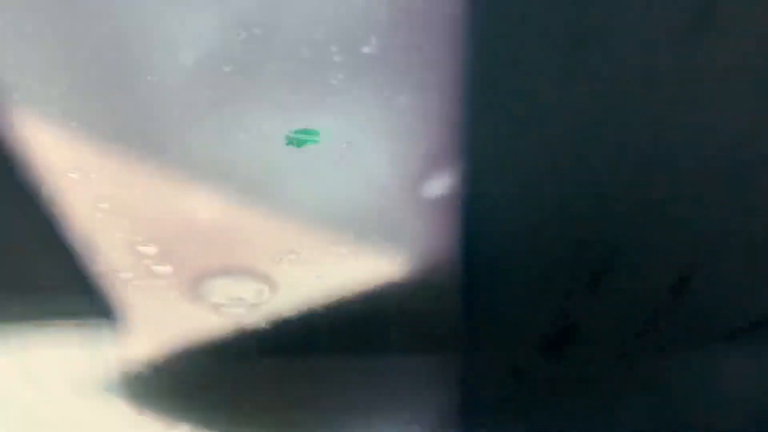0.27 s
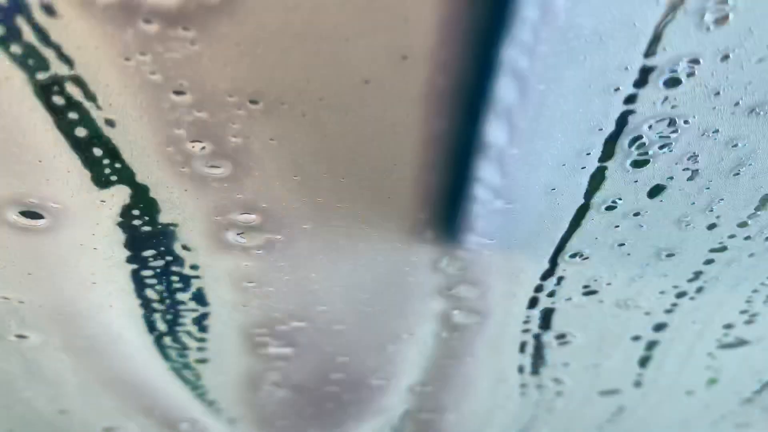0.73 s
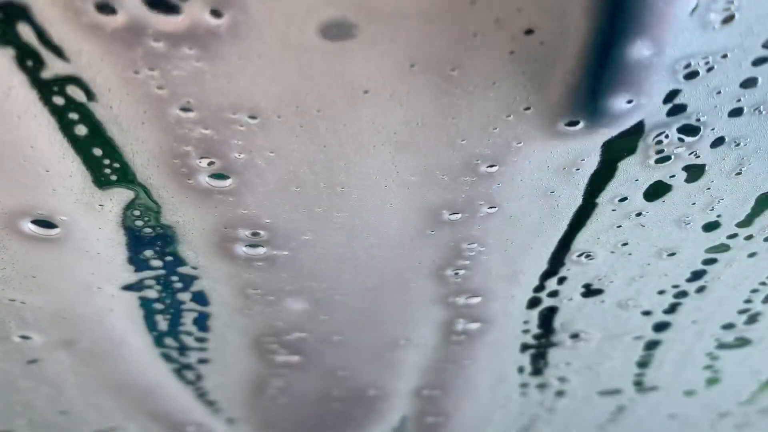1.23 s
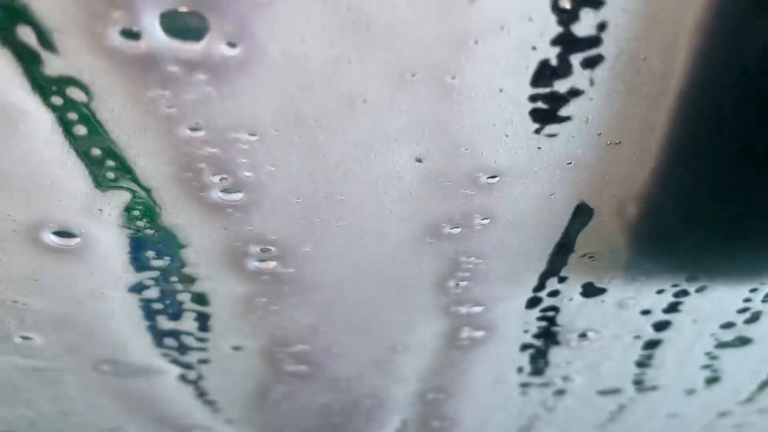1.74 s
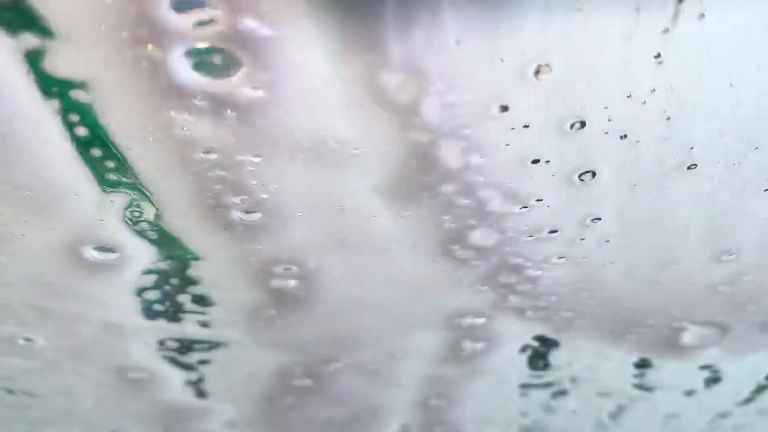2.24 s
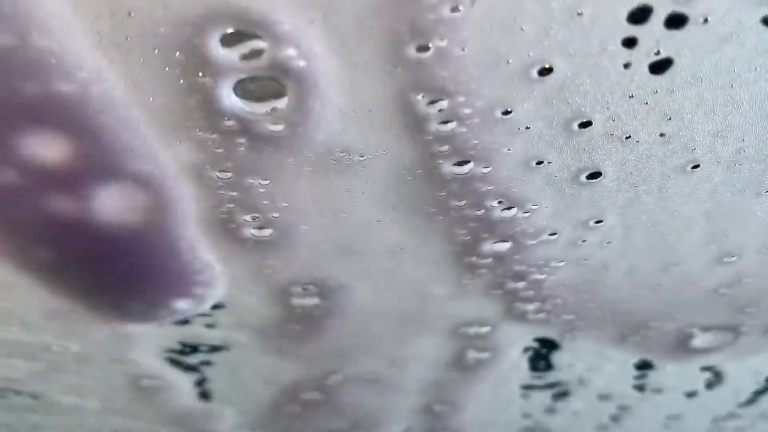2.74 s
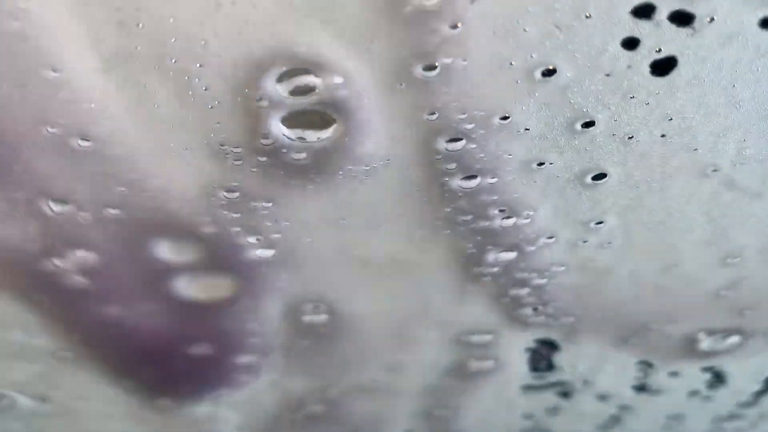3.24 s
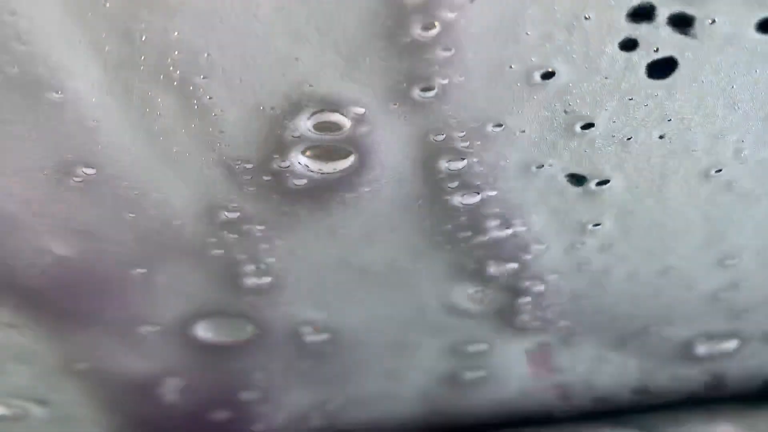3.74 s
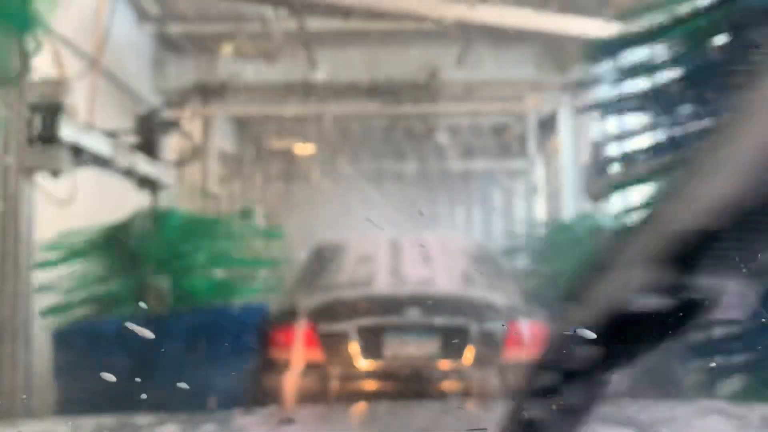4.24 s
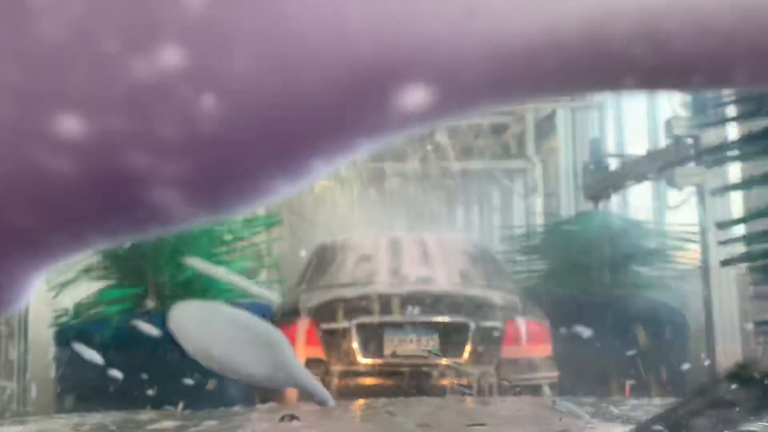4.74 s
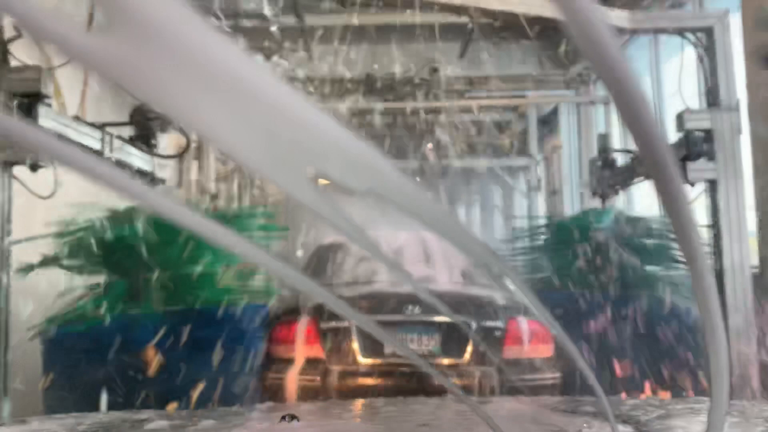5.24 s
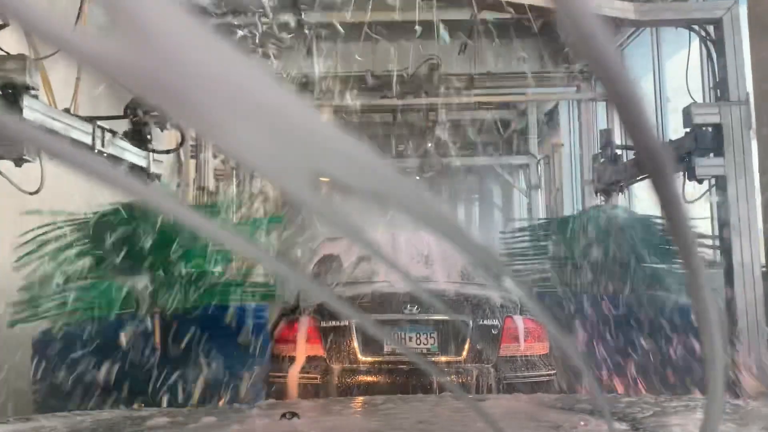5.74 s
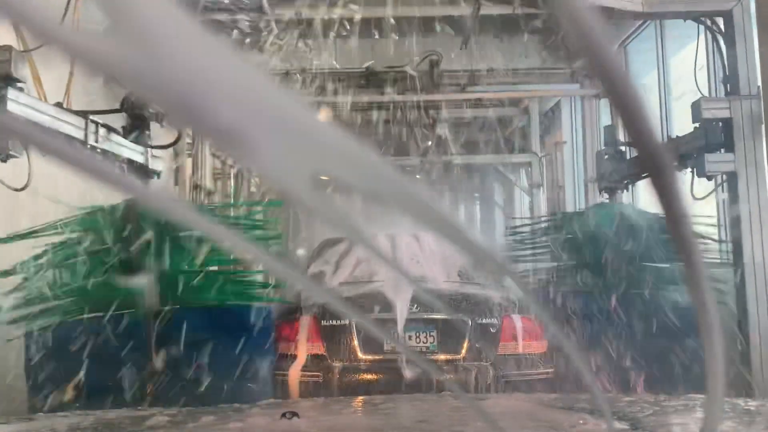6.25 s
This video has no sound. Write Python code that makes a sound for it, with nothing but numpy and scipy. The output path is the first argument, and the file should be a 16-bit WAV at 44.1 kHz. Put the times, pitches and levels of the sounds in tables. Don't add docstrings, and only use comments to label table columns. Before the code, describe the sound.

A low, boomy car interior during a wash, microphone near the glass and doors. Soft wet flapping and deep shaking come first, with a splat on the window. Brush strips then bear down hard, drumming metal, ringing trim and scraping glass, before settling into lighter, uneven slapping along the doors. Water rushes dully over the body, another crisp splat lands, and a tiny high rubber squeak comes near the end.

```python
import sys
import numpy as np
from scipy import signal
from scipy.fft import rfft, irfft, next_fast_len
from scipy.io import wavfile
from scipy.ndimage import uniform_filter1d, map_coordinates

SR = 44100
rng = np.random.default_rng(int(sys.argv[2]) if len(sys.argv) > 2 else 0)


def log_audio(samples):
    frames = np.atleast_2d(samples).T
    limited = np.clip(frames, -1, 1)
    pcm = np.round(limited * 32767).astype(np.int16)
    wavfile.write(sys.argv[1], SR, pcm)


def nominal_scale(level):
    x = np.asarray(level, float) / 20
    return 10 ** x


N = 285768

# (time [s], cloth pressure [dB], place [0 nose to 1 doors], sliding water [dB])
BRUSH_PASS = [(0.0, -34.5, 0, -33.5), (.45, -36, 0.057, -31), (.9, -36.5, 0.063, -30),
              (1.3, -34, 0.058, -28.5), (1.9, -25, 0, -24), (2.3, -19, 0.32, -27), (2.95, -20, 0.82, -23.5),
              (3.45, -22.5, 0.78, -21.5), (3.9, -27, 0.97, -23.5), (4.5, -28, 1, -26),
              (5.0, -26.5, 0.89, -27), (5.5, -28.5, 0.98, -26.5), (6.0, -28, 0.88, -26),
              (6.48, -30, 1, -28.5)]
TURN_STARTS = [-.06, .52, 1.17, 1.812, 2.432, 3.028, 3.644, 4.262, 4.881, 5.497, 6.135, 6.76]
BUNCH_ANGLES = [0, .1, .26, .32, .48, .59, .66, .79, .9]
# (contact length [s], strength [dB], weight on the door [dB])
CLOTH_BUNCHES = [(0.041, 1, 2), (0.054, -2, 0.5), (0.023, 0, 3), (0.059, -1, -2), (0.047, 0.5, 0),
                 (0.026, 1, -3), (0.055, -3, 0), (0.033, -1.5, 3.5), (.025, -1, 3)]
# (time [s], contact length [s], level over the pressure [dB], weight on the door [dB])
SOAKED_BUNCHES = [(.0, .07, -0.5, 2), (0.186, 0.021, 4.5, -6.5), (0.434, 0.067, -3, 0),
                  (0.992, 0.027, 4.5, 10), (1.377, 0.02, 1, 4), (1.525, 0.023, -4, 1),
                  (1.729, 0.047, 2.5, 4.5), (2.184, .023, 0.5, -4), (2.129, .045, -2.5, -3),
                  (2.328, 0.042, -0.5, -3), (5.605, 0.021, -0.5, 4), (2.571, 0.034, -2, -17),
                  (2.875, 0.065, -0.5, -6), (2.958, .032, 2, -4), (3.101, .045, -2.5, 2),
                  (3.188, .045, 1.5, 8), (3.337, 0.037, -2.5, 7.5), (3.513, 0.014, 4.5, 3),
                  (3.58, 0.0076, 3, -9), (3.801, .017, 4, 5.5), (4.112, 0.013, 2, 8),
                  (4.431, 0.027, 3.5, -7), (4.759, 0.027, 0, 1), (5.09, 0.016, -2, 1),
                  (5.371, 0.011, 2.5, 1), (5.915, 0.022, -3, -19), (5.979, .04, 1, 4.5),
                  (6.252, 0.049, 0, 4.5), (6.194, 0.015, 0.5, -16), (6.4, 0.062, -2, 4)]
# (time [s], length
# [s], level change [dB])
BRUSH_GAPS = [(0.99, 0.039, -5.5), (1.139, 0.029, -1.5), (1.456, 0.067, -3.5), (1.717, 0.026, -3.5),
              (1.801, 0.027, -4), (2.251, 0.02, -9), (2.397, 0.026, -10), (2.545, 0.039, -2),
              (2.683, 0.016, 4.5), (2.848, 0.025, -7), (3.001, 0.037, -8.5), (3.173, 0.03, -4),
              (3.384, 0.021, -4.5), (3.622, 0.02, -7.5), (3.795, 0.036, -4.5), (4.094, .025, -4),
              (4.245, 0.017, -7.5), (4.408, 0.042, -6.5), (4.55, 0.018, -3.5), (5.04, 0.029, -2.5),
              (5.172, 0.033, -4), (5.649, 0.013, -7), (5.736, 0.015, -4.5), (6.027, 0.023, -2.5),
              (6.126, 0.018, -4.5), (6.356, 0.022, -9.5)]
# (frequency [Hz], level [dB])
SCRUB_BAND = [(400, -38.5), (650, 2.5), (800, 4), (890, -4), (980, -7), (1100, -3), (1400, -3.5),
              (2050, -9), (2650, -12), (3400, -18), (4300, -26.5), (6000, -62)]
# (frequency [Hz], width [Hz], level [dB])
TRIM_MODES = [(1278, 33, -2), (1423, 20, 0), (1636, 26, 2.5), (1920, 220, -9), (2147, 150, -5.5),
              (2387, 66, 0), (2608, 41, 3.5), (2954, 380, -6.5)]
# (frequency [Hz], width [Hz], level [dB])
PANEL_MODES = [(195, 60, -2), (255, 50, -5), (465, 70, -9), (615, 60, -8), (750, 60, -14), (810, 40, -18),
               (975, 50, -13)]
# (frequency [Hz], width [Hz], level [dB])
DOOR_MODES = [(300, 45, -4), (355, 60, 0), (415, 45, -5)]
# (frequency [Hz], level [dB])
FIZZ_BAND = [(2800, -32.5), (3500, 0.5), (4700, 0), (6000, -10.5), (8000, -18.5), (9500, -28.5),
             (11200, -43.5), (13000, -43.5), (15800, -41.5)]
# (time [s], length [s], shake [dB], boom [dB], drone [dB])
SPRING_ROCKS = [(0.15, .15, 7, -1.5, 1.5), (.7, 0.092, 4.5, -3.5, 0), (0.997, .08, 3, -4.5, 1.5),
                (1.18, 0.031, 5, -9, 2), (1.85, 0.12, -2, 3.5, -7), (2.146, .08, -3, 4.5, -2),
                (2.38, .05, -7, 3, -4), (2.607, .06, -4, 3.5, -1.5), (2.757, 0.05, 1, -2.5, 6),
                (2.974, 0.085, -1, -6.5, 4.5), (3.087, 0.028, -7, 6, 3), (3.205, 0.05, 0, -9, 0),
                (3.323, .08, -7.5, 6, 1), (3.57, 0.063, 10.5, -0.5, -3.5), (3.72, .08, 3, 4, 5),
                (4.0, 0.16, 9, 2, -1), (4.35, 0.17, 7, -1, -1), (4.687, .06, -1, 5, -8),
                (4.753, .04, 6, -5, 7), (4.973, .05, -4, 6, -5), (5.416, 0.11, -7, 5, 1),
                (5.57, 0.11, 7, -5, 7), (5.926, 0.087, -4.5, -2, 3.5), (6.146, .1, 1.5, 3, -4)]
# (level at the nose [dB], gain towards the doors [dB], random sway [dB], sways [1/s])
SHELL_LAYERS = [
    (-25, -2.5, 1.2, 6),
    (-26, 7.5, 1.2, 7),
    (-29, 3, 1.5, 8),
]
# (frequency [Hz], level [dB])
SHAKE_BAND = [(15, -34), (25, -19), (34, -13), (48, 0), (56, -3), (66, -30)]
# (frequency [Hz], level [dB])
BOOM_BAND = [(50, -15.5), (60, 8.5), (70, 6), (88, 8), (104, -1.5), (120, -72.5)]
# (frequency [Hz], level [dB])
DRONE_BAND = [(85, -20), (98, 2.5), (120, 27.5), (140, 15), (165, -10), (200, -50)]
# (time [s], level [dB], rise [s], 60 dB decay [s], centre [Hz], width [Hz])
GLASS_SPLATS = [
    (0.807, -32, 0.0006, 0.04, 3280, 1300),
    (3.552, -52, 0.00043, .04, 8000, 2500),
    (5.25, -30.5, .0004, 0.047, 4900, 3200),
    (5.249, -53.5, .0004, .08, 13900, 2420),
    (5.254, -42.5, 0.0003, .012, 13500, 3000),
    (5.707, -57.5, 0.00046, .03, 12000, 4000),
    (6.224, -51, .002, .04, 13400, 350),
    (6.233, -48, 0.0033, .07, 13500, 400),
]
# (frequency [Hz], level [dB])
SLIDING_BAND = [(100, -7), (150, -2), (315, -6), (490, -12.5), (900, -21), (1700, -28), (2500, -30.5),
                (4500, -46.5), (8000, -59), (11200, -91.5)]
# (frequency [Hz], level [dB])
JET_BAND = [(1500, -29.5), (2500, 0), (4500, -14), (8000, -22), (10000, -33.5), (11300, -38),
            (12800, -35.5), (15800, -31)]
# (frequency [Hz], level [dB rms])
ELECTRONIC_WHINE = [(9987, -92), (11984, -98.5)]


def brushes():
    press_db, place, _ = curves(BRUSH_PASS)
    press = nominal_scale(press_db + lift())
    strips = bunches()
    db, door_db = strips[:, 2], strips[:, 3]
    drum_db, fizz_db = (db + 1.2 * rng.standard_normal(len(strips)) for _ in range(2))

    def push(nose_db, doors_db, slope):
        usual_db = -28
        return press * nominal_scale(nose_db + doors_db * place + slope * (press_db - usual_db))

    drag = contact(strips, db, rise=0.0016, fall=0.0031, slap=0.96)
    scrub = driven(patter(1.2, 1.1), press * drag, colour(SCRUB_BAND))
    trim = driven(patter(1.8, 2.6), push(-1.3, -8.5, -0.16) * drag, modes(TRIM_MODES, glass_hz=3020))

    blows = contact(strips, drum_db, rise=0.001, fall=0.0089, slap=0.26)
    drum = driven(patter(0.68, 1.3), push(4.68, 5.7, -0.25) * blows, modes(PANEL_MODES, glass_hz=1330))

    door_blows = contact(strips, db + door_db, rise=0.0011, fall=0.0075, slap=0.63)
    door = driven(patter(0.31, 0.76), push(0, 9.9, -0.12) * door_blows, modes(DOOR_MODES, glass_hz=534))

    tips = contact(strips, fizz_db, rise=0.0016, fall=0.0031, slap=0.42)
    fizz = driven(patter(1.4, 2.6), push(-19, 1.7, -0.03) * tips, colour(FIZZ_BAND))
    return nominal_scale(-2.5) * scrub + trim + drum + door + fizz


def bunches():
    slip_s, scatter_db = 0.004, 1
    length, db, door_db = np.transpose(CLOTH_BUNCHES)
    s = np.array(TURN_STARTS[:-1])[:, None] + np.diff(TURN_STARTS)[:, None] * BUNCH_ANGLES
    landing_s = s + slip_s * rng.standard_normal(s.shape)
    strength_db = db + scatter_db * rng.standard_normal(s.shape)
    rows = np.stack([landing_s, length + 0 * s, strength_db, door_db + 0 * s], -1)
    return np.vstack([rows.reshape(-1, 4), SOAKED_BUNCHES])


def contact(strips, levels_db, rise, fall, slap):
    power = np.zeros(N)
    t = np.arange(N) / SR
    for (s, length, *_), db in zip(strips, levels_db):
        start, stop = (max(int(edge * SR), 0) for edge in (s - 0.05, s + length + 0.1))
        u = t[start:stop] - s
        landing = (0.61 + slap * np.exp(-np.abs(u) / 0.0086)) / (1 + np.exp(-u / rise))
        peeling = 1 / (1 + np.exp((u - length) / fall))
        power[start:stop] += nominal_scale(2 * db) * landing * peeling
    return np.sqrt(power)


def lift():
    t = np.arange(N) / SR
    return sum(db * np.exp(-((t - s) / (0.64 * length)) ** 2) for s, length, db in BRUSH_GAPS)


def shell():
    t = np.arange(N) / SR
    place = curves(BRUSH_PASS)[1]
    rocking = sum(np.outer(db, np.exp(-((t - s) / length) ** 2)) for s, length, *db in SPRING_ROCKS)
    bands, steadiness = (SHAKE_BAND, BOOM_BAND, DRONE_BAND), (0.8, 0.7, 0.4)
    out = np.zeros(N)
    for layer, rock_db, band, share in zip(SHELL_LAYERS, rocking, bands, steadiness):
        nose_db, doors_db, sway_db, rate = layer
        level_db = nose_db + doors_db * place + sway_db * wobble(rate) + rock_db
        rumble = filtered(rng.standard_normal(N), colour(band))
        out += nominal_scale(level_db) * even(rumble, share)
    return out


def even(x, share):
    swell = uniform_filter1d(np.abs(signal.hilbert(unit(x))), size=1500)
    return unit(x / (swell + 0.48) ** share)


def drops():
    out = np.zeros(N + SR)
    t = np.arange(SR // 8) / SR
    hz = np.fft.rfftfreq(len(t), 1 / SR)
    for s, db, rise, t60, centre_hz, width_hz in GLASS_SPLATS:
        band = np.exp(-((hz - centre_hz) / width_hz) ** 2)
        burst = unit(irfft(rfft(rng.standard_normal(len(t))) * band, len(t)))
        envelope = nominal_scale(db - 60 * t / t60) * (1 - np.exp(-t / rise))
        out[round(s * SR):][:len(t)] += envelope * burst
    return out[:N]


def spray():
    level_db = curves(BRUSH_PASS)[2]
    sliding = driven(patter(1.2, 0.57), 0.97, colour(SLIDING_BAND))
    jets = driven(patter(1.0, 0.44), 0.83, colour(JET_BAND))
    return nominal_scale(level_db + 6 + lift()) * sliding + nominal_scale(level_db - 18) * jets


def patter(patchy_db, grain_db):
    z = signal.stft(rng.standard_normal(N), nperseg=512)[2]
    field = uniform_filter1d(rng.standard_normal(z.shape), 8, axis=0)
    field = uniform_filter1d(field, 5, axis=1)
    noise = signal.istft(z * nominal_scale(patchy_db * unit(field)), nperseg=512)[1][:N]
    return unit(noise * nominal_scale(grain_db * wobble(220)))


def driven(force, gain, response):
    return filtered(force * gain, response) / np.std(filtered(force, response))


def modes(table, glass_hz):
    def response(f):
        ring = 0
        for k, (centre, width, db) in enumerate(table):
            sign = (-1) ** k
            ring = ring + sign * nominal_scale(db) * 1j * f * width / (centre ** 2 - f * f + 1j * f * width)
        return ring / (1 + 1.4j * f / glass_hz - (f / glass_hz) ** 2) ** 2
    return response


def colour(points):
    f, db = np.transpose(points)
    return lambda hz: nominal_scale(np.interp(np.log(hz + 1), np.log(f), db, left=-120, right=-120))


def filtered(x, response):
    m = next_fast_len(N + SR // 2)
    return irfft(rfft(x, m) * response(np.fft.rfftfreq(m, 1 / SR)), m)[..., :N]


def curves(rows):
    s, *columns = np.transpose(rows)
    return [np.interp(np.arange(N) / SR, s, column) for column in columns]


def wobble(rate):
    knots = rng.standard_normal(int(N * rate / SR) + 4)
    return map_coordinates(knots, [np.arange(N) * rate / SR])


def unit(x):
    return x / np.sqrt(np.mean(x ** 2) + 1e-20)


def scene():
    return (brushes() + shell() + drops() + spray())[None]


def low_pass(x):
    return signal.sosfilt(signal.butter(12, 15960, fs=SR, output="sos"), x)


def record(dry):
    t = np.arange(N) / SR
    clipped = dry / (1 + np.abs(dry) ** 24) ** (1 / 24)
    whine = sum(nominal_scale(db - 3) * np.sin(2 * np.pi * hz * t) for hz, db in ELECTRONIC_WHINE)
    hiss = nominal_scale(-84.5) * rng.standard_normal(N)
    mix = filtered(clipped + whine + hiss, lambda hz: hz < 15740)
    return low_pass(mix)


dry = scene()
out = record(dry)
log_audio(out)
```